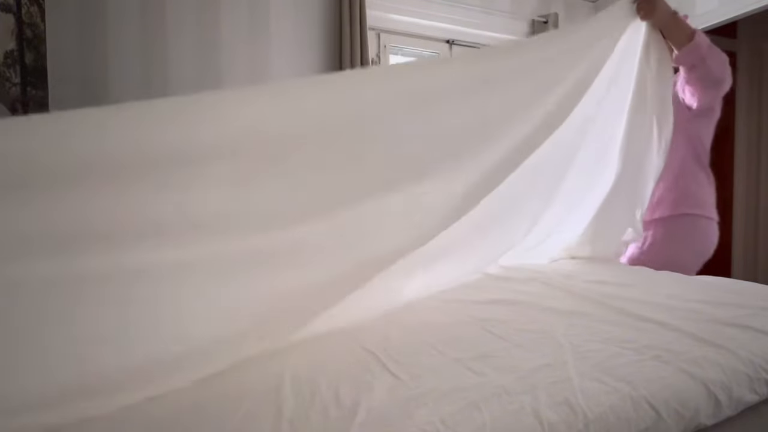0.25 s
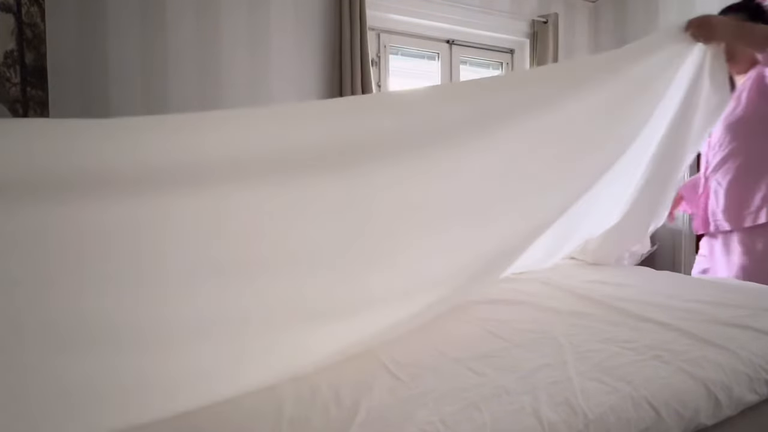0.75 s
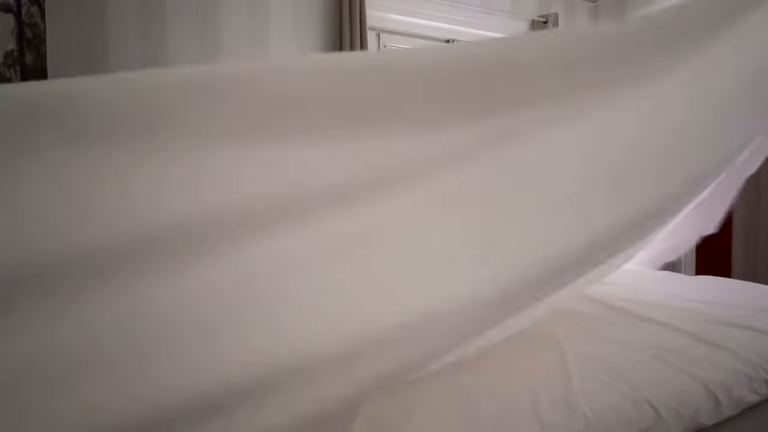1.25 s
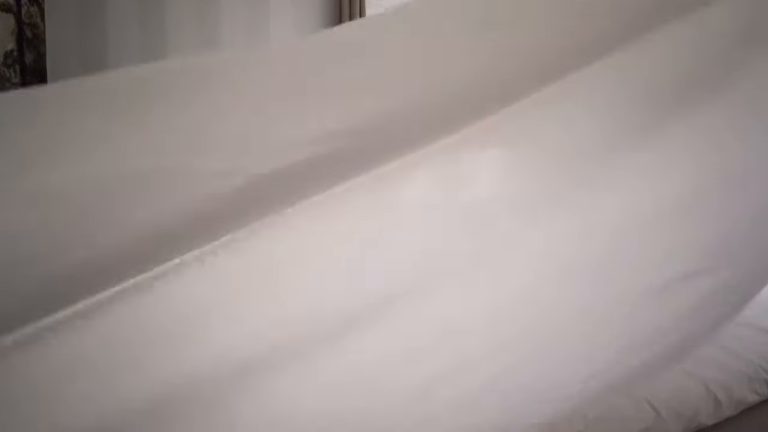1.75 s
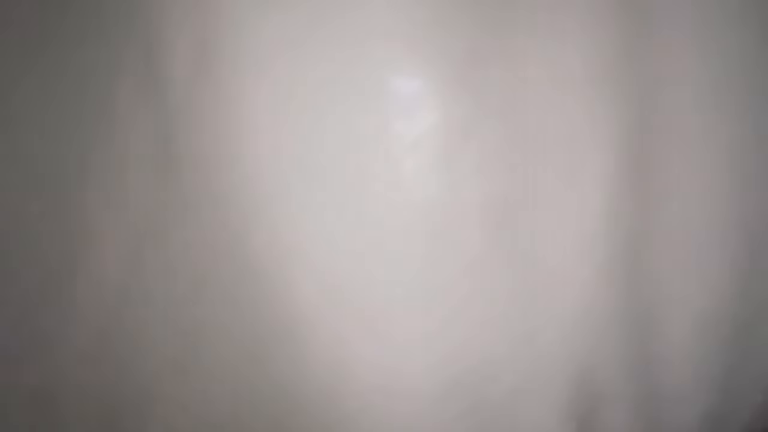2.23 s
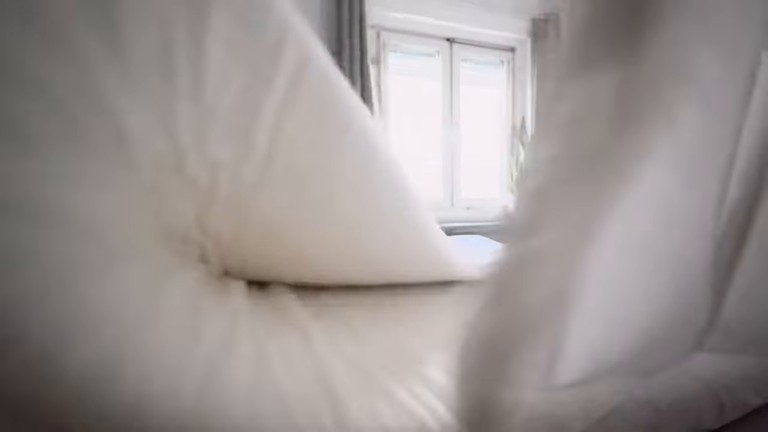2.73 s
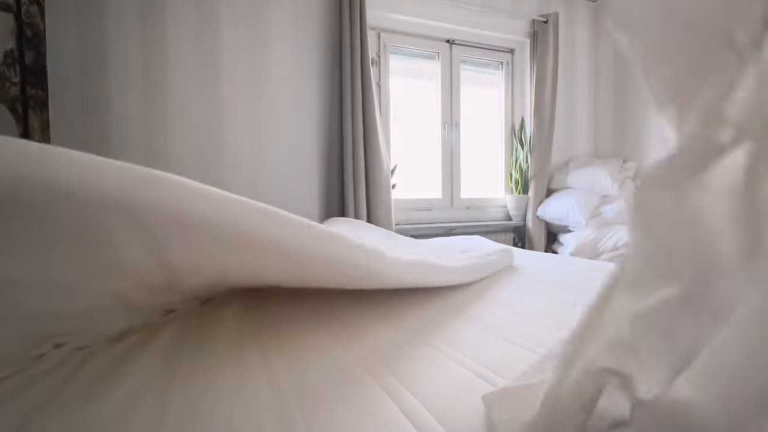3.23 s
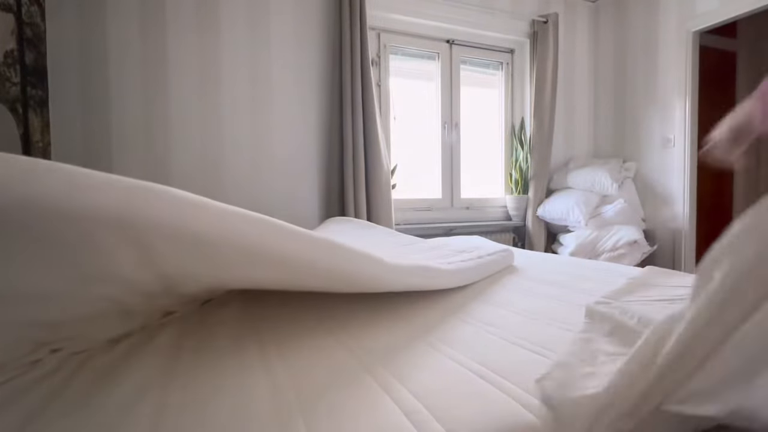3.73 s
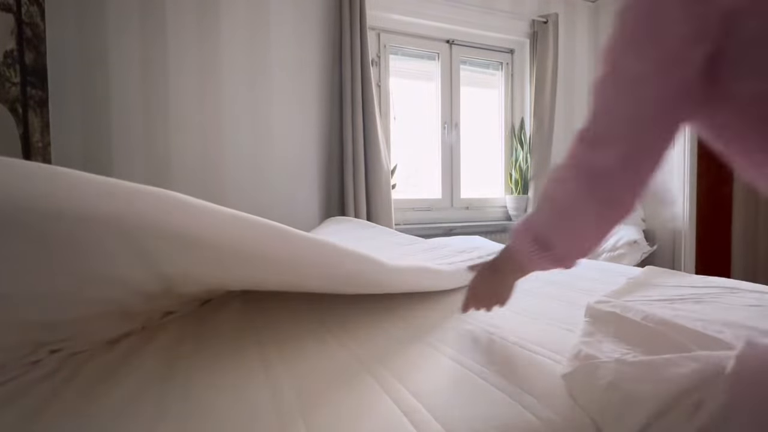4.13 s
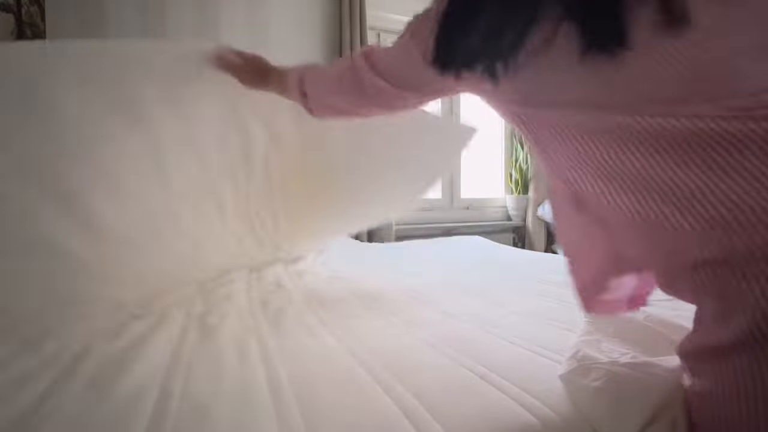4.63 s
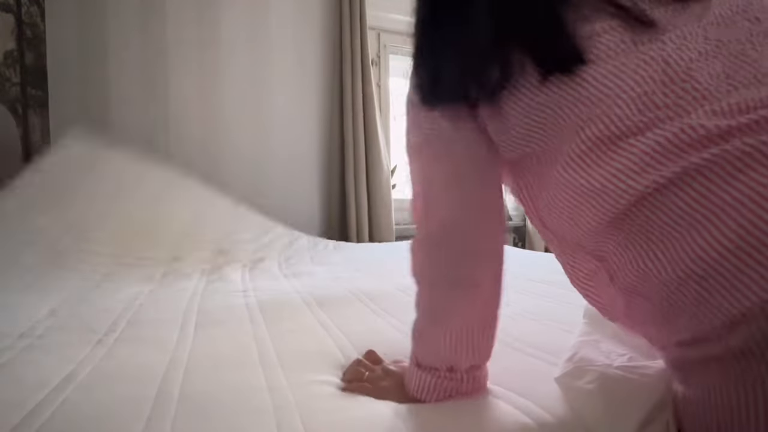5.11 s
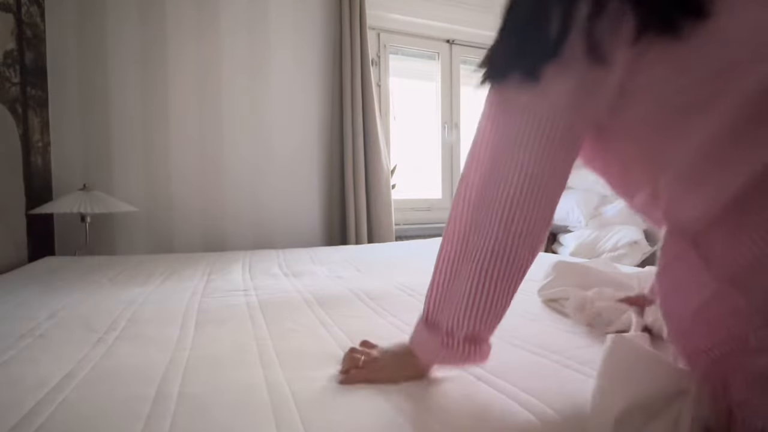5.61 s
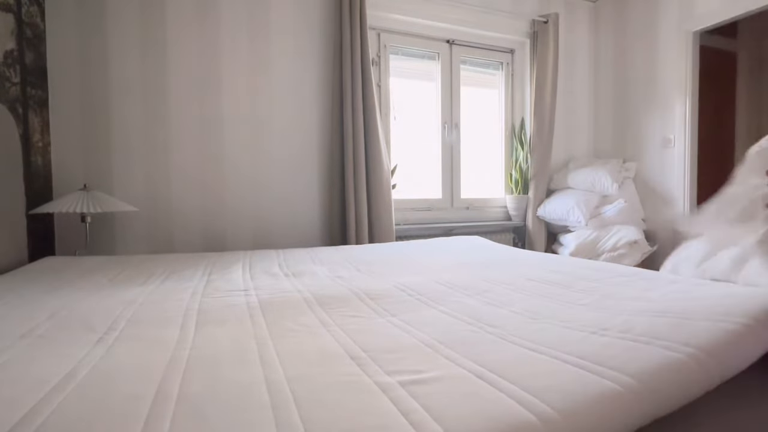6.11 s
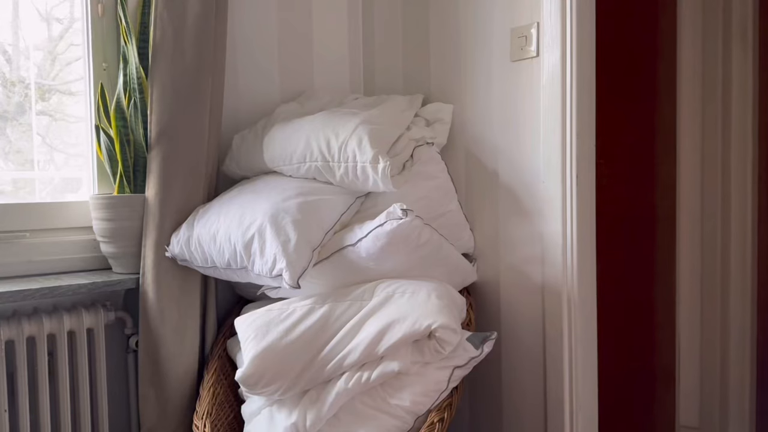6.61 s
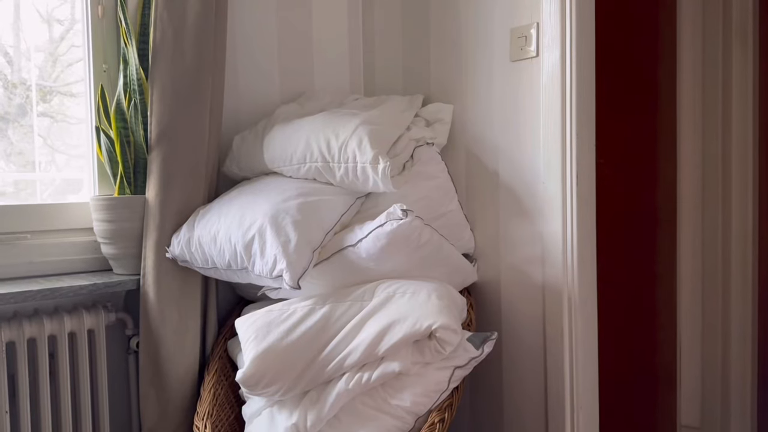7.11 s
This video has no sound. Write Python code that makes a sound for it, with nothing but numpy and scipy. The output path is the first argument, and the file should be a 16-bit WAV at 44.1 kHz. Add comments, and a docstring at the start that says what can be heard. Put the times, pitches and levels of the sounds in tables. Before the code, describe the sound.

Light cotton cloth whispers and crackles near two spaced microphones in a small, slightly live room. A quick swish leads to a sharp woody knock, then soft low flaps and a cluster of dry fabric snaps. Quieter rustling and footstep-like board knocks come next, then a thick topper lands with a big low thud. Brief hand scuffs continue until the sound stops suddenly, leaving faint room hush.

```python
"""Making a bed in a small bedroom

A cotton sheet and a thick topper are spread close to two spaced microphones. Cloth slides and crackles as
shaped noise; folds snap and scuff as brief noise bursts; floor boards knock under steps as struck resonances.
Heavy bedding thumps as low pushes of air and sets the room's bass modes ringing.
The sound cuts to the quiet room near the end, steady noise with one small click."""
import sys
import numpy as np
from scipy import signal
from scipy.fft import rfft, irfft, next_fast_len
from scipy.io import wavfile
from scipy.ndimage import uniform_filter1d, map_coordinates

SR = 44100
rng = np.random.default_rng(int(sys.argv[2]) if len(sys.argv) > 2 else 0)


def inscribe(sig):
    """Save sig as 16-bit PCM at rate SR to the path in sys.argv[1].

    A 1-D sig is mono; a 2-D sig holds one channel per row.
    Samples are clipped to [-1, 1] before scaling.
    """
    pcm = np.round(np.clip(np.atleast_2d(sig).T, -1, 1) * 32767)
    wavfile.write(sys.argv[1], SR, pcm.astype(np.int16))


N = 324311
LAG_S = 0.000341  # the left microphone stands farther from the bed
CUT_S = 6.612  # the sound cuts to the quiet room here

# Strokes of cloth over cloth: (time of greatest level [s], slide level [dB], nap level against slide [dB],
# time to rise 10 dB [s], time to fall 10 dB [s]); the signs of the last two are ignored
STROKES = [(0.49, -66.5, -37, -0.24, 0.65), (0.79, -72, -8.5, 0.1, 2), (1.11, -49, -15.5, 0.0841, 0.0745),
           (1.2, -71, -27, -0.09, -0.23), (1.33, -57.5, -17, 0, 0.1), (1.891, -57.5, -11, -0.04, 0.12),
           (2.02, -59.5, -6, 0.13, 0.48), (2.61, -53, -25, -0.1, -0.09), (2.689, -52.5, -7.5, 0.02, 0.18),
           (3.36, -69, -9, 0.1, -0.5), (3.47, -64.5, -13.5, -0.46, 0.7), (3.8, -59.5, -7, 0.1, 0.1),
           (4.36, -66, -8.5, 0.3, 0.2), (4.66, -60.5, -4.5, 0.11, 0.21), (5.027, -58, -9, 0.12, 0.1),
           (5.27, -63.5, -21, -0.23, 0.4), (5.55, -61.5, -22, -0.13, 0.03), (5.769, -55.5, -18, -0.04, 0.1),
           (5.84, -56.5, -12, 0.04, 0.06), (6.05, -66.5, -34, -1, 1), (6.26, -59.5, -10, 0.02, 0.23)]


def amp(db):
    """Level law: 20 dB is a factor of ten in amplitude."""
    return 10 ** (np.asarray(db) / 20)


def unit(x):
    """Normalisation by mean power: scaled to rms 1."""
    return x / np.sqrt(np.mean(x ** 2) + 1e-20)


def along(points, hz):
    """Logarithmic pitch scale: (Hz, value) points joined by straight lines over log frequency."""
    f, v = np.transpose(points)
    return np.interp(np.log(hz + 1), np.log(f + 1), v)


def filtered(x, response):
    """Linear filtering: the spectrum of x times a complex response of frequency."""
    n = x.shape[-1]
    padded = next_fast_len(n + 8192)  # keeps the filter's tail from wrapping round
    spectrum = rfft(x, padded) * response(np.fft.rfftfreq(padded, 1 / SR))
    return irfft(spectrum, padded)[..., :n]


def lag(hz, s=LAG_S):
    """Arrival-time difference as linear phase: left half late, right half early."""
    return np.exp(-1j * np.pi * hz * s * np.array([[1], [-1]]))


def resonances(modes, f):
    """Modal superposition: a causal sum of (Hz, width Hz, dB) band-pass peaks with alternating signs."""
    total = 0
    for k, (centre, width, db) in enumerate(modes):
        peak = 1j * f * width / (centre * centre - f * f + 1j * f * width)
        total = total + (-1) ** k * amp(db) * peak
    return total


def wobble(rate):
    """Slow random modulation: a smooth curve through rate random knots a second."""
    knots = rng.standard_normal(int(N * rate / SR) + 4)
    return map_coordinates(knots, [np.arange(N) * rate / SR])


def curves(rows):
    """Linear interpolation: one value per sample for each column after the time."""
    s, *columns = np.transpose(rows)
    return [np.interp(np.arange(N) / SR, s, c) for c in columns]


def cloth():
    """Friction noise at five scales: air pushed, big folds, sliding faces, thread on thread, brushed nap."""
    # Resting levels beneath the strokes, with a sudden change at 1.89 s:
    # (time [s], pushed air [dB], folds [dB], sliding faces [dB])
    resting_levels = [(0.0, -73.5, -68, -72), (0.29, -52, -70, -70), (0.53, -98, -79, -75.5),
                      (0.7, -70.5, -67.5, -65), (0.99, -66, -59.5, -71), (1.25, -54.5, -55, -59.5),
                      (1.58, -51.5, -54.5, -66.5), (1.72, -61, -64.5, -65), (1.882, -69.5, -69, -76),
                      (1.89, -64.5, -56, -60), (2.37, -56.5, -63, -62.5), (2.81, -56, -57, -62.5),
                      (3.12, -62.5, -61, -69.5), (3.3, -51.5, -59.5, -67), (3.6, -63.5, -59, -71),
                      (4.2, -62.5, -64.5, -68.5), (4.7, -61, -64, -70), (4.85, -54, -62.5, -71),
                      (5.11, -64, -59, -68), (5.35, -46.5, -54, -72), (5.68, -51, -59.5, -71.5),
                      (5.9, -58.5, -54.5, -72), (6.15, -53.5, -56.5, -66.5), (6.27, -54.5, -55, -63.5),
                      (6.61, -52.5, -52.5, -62.5)]
    # Spectra of the five scales, each: (frequency [Hz], relative power density [dB])
    air_spectrum = [(15, -37), (25, -10.5), (65, 7.5), (151, -14), (200, -15.5), (260, -38.5), (440, -120)]
    folds_spectrum = [(60, -44.5), (150, 0), (300, -4.5), (700, -5.5), (1200, -12), (2500, -24),
                      (6000, -90.5)]
    slide_spectrum = [(500, -27), (1200, -1), (2500, -6.5), (4000, -10), (5500, -11.5), (9000, -34),
                      (12000, -92.5)]
    weave_spectrum = [(2500, -31.5), (5000, -9.5), (7000, -11.5), (10000, -14.5), (12000, -49.5)]
    nap_spectrum = [(9000, -28), (12500, 7), (14000, -1.5), (16000, -17.5)]
    usual_slide_db, weave_db, weave_growth = -63, -68, 0.87  # weave at the usual slide; it swings less
    folds_in_stroke_db = -7.5  # folds dragged along, against the slide
    nap_rest_db, nap_steeper = -90.5, 1.2  # nap between strokes; it comes and goes faster than the slide
    crackle_db = -6  # against the slide

    air_db, folds_db, rest_db = curves(resting_levels)
    _, peak_db, nap_db = np.transpose(STROKES)[:3]
    stroke_power = strokes(peak_db)
    slide = np.sqrt(amp(rest_db) ** 2 + stroke_power)
    folds = np.sqrt(amp(folds_db) ** 2 + amp(folds_in_stroke_db) ** 2 * stroke_power)
    weave = amp(weave_db) * (slide / amp(usual_slide_db)) ** weave_growth
    nap = np.sqrt(amp(nap_rest_db) ** 2 + strokes(peak_db + nap_db, nap_steeper))
    flutter = amp(1.0 * wobble(25))  # the faces touch and part unevenly

    # The two-row gains tilt a layer slightly to one side, in dB
    layers = amp(air_db) * rustle(air_spectrum, patchy_db=1.5, grain_db=-2.5, grain_rate=9.8)
    layers += folds * rustle(folds_spectrum, patchy_db=-1.0, grain_db=2.5, grain_rate=14) * amp([[-.6], [.6]])
    faces = rustle(slide_spectrum, patchy_db=1.5, grain_db=0.5, grain_rate=240)
    layers += flutter * slide * faces * amp([[.8], [-.8]])
    layers += amp(crackle_db) * slide * crackle()
    threads = rustle(weave_spectrum, patchy_db=0.5, grain_db=-0.1, grain_rate=230)
    layers += flutter * weave * threads * amp([[.6], [-.6]])
    brushed = rustle(nap_spectrum, patchy_db=2.5, grain_db=1.5, grain_rate=140,
                     delay=np.ones_like, alike=[(14000, 0.83)])  # straight ahead
    layers += flutter * nap * brushed
    return layers * (np.arange(N) / SR < CUT_S)


def strokes(levels_db, steeper=1):
    """Incoherent addition: strokes rise and fall evenly in dB, and overlapping ones add in power."""
    s, _, _, rise, fall = np.transpose(STROKES)[:, :, None]
    t = np.arange(0, N, 64) / SR - s
    distance = np.where(t < 0, -t / np.abs(rise), t / np.abs(fall))
    db = levels_db[:, None] - 10 * steeper * distance
    return np.repeat(np.sum(amp(db) ** 2, axis=0), 64)[:N]


def rustle(spectrum, patchy_db, grain_db, grain_rate, delay=lag, alike=None):
    """Shaped, partly coherent stereo noise of rms 1: patchy in time and pitch, and lumpy in level."""
    # Usual coherence of the spaced microphones: (frequency [Hz], left-right likeness [0 to 1])
    usual_likeness = [(40, 1), (150, 0.75), (400, 0.34), (1000, 0.18), (4000, 0.12), (9000, 0.1),
                      (14000, 0.26)]
    likeness = usual_likeness if alike is None else alike

    z = signal.stft(rng.standard_normal((2, N)), nperseg=512)[2]
    patches = uniform_filter1d(rng.standard_normal(z.shape[1:]), size=6, axis=0)
    patches = uniform_filter1d(patches, size=8, axis=1)
    pair = signal.istft(z * amp(patchy_db * unit(patches)), nperseg=512)[1][:, :N]
    pair = pair * amp(grain_db * wobble(grain_rate))  # in cloth, fibres catch and slip

    def mid_side(hz):
        turn = np.arccos(np.clip(along(likeness, hz), -1, 1)) / 2  # the mid-side mix sets the likeness
        return amp(along(spectrum, hz)) * [np.cos(turn), np.sin(turn)]

    mid, side = filtered(pair, mid_side)
    return unit(filtered(np.array([mid + side, mid - side]), delay))


def crackle():
    """Random impulse train: small ticks of the starched cloth, scattered in time, pitch, size and direction."""
    per_s, spread_db, middle_hz = 500, 2, 3000
    count = int(per_s * N / SR)
    when, size, pan, *pitch = rng.random((5, count))
    hz = middle_hz * 2 ** (2.4 * (sum(pitch) - 1))[:, None]
    cycles = hz * np.arange(128) / SR
    size_gain = amp(-spread_db * np.log(1 - size))[:, None]
    tick = size_gain * np.exp(-cycles / 1.1) * np.sin(2 * np.pi * cycles)  # dies in one or two cycles
    at = ((when * N).astype(int)[:, None] + np.arange(128)).ravel()
    sides = [np.bincount(at, (tick * gain[:, None]).ravel(), N)[:N]
             for gain in (np.sqrt(pan), np.sqrt(1 - pan))]
    return unit(filtered(np.array(sides), lag))


def snaps():
    """Sudden release of tension: each crease snaps straight in a brief, band-limited burst of noise."""
    # Creases: (time [s], peak level before the room [dB], pitch [Hz], decay by 60 dB [s])
    creases = [(1.977, -43.5, 3500, .035), (2.168, -46, 3000, 0.028), (2.52, -44, 2800, .009),
               (2.576, -46, 1600, .02), (2.66, -45, 5040, .025), (2.683, -41.5, 1590, 0.024),
               (2.719, -40, 900, .02), (2.754, -39.5, 1700, 0.0087), (3.781, -55, 2800, .015),
               (3.836, -50, 2770, .02)]
    out, t = np.zeros((2, N)), np.arange(SR // 2) / SR
    for s, db, hz, t60 in creases:
        burst = rng.standard_normal(len(t)) * t * amp(-60 * t / t60)
        tick = filtered(burst, lambda f: resonances([(hz, 1.5 * hz, 0)], f) ** 2)
        add(out, s, amp(db) * in_room(tick / np.abs(tick).max(), wet_db=-3))
    return out


def scuffs():
    """Friction over a periodic texture: a swell of noise around a pitch set by the stroke's speed over threads."""
    # Hand or fold over cloth: (time [s], level before the room [dB], pitch [Hz], length [s], width over pitch [1])
    short_strokes = [(0.439, -59, 705, 0.09, 1.4), (0.508, -57, 1480, 0.065, 0.91),
                     (1.061, -49, 2640, 0.09, 0.56), (2.353, -52.5, 1100, 0.053, 0.33),
                     (2.672, -44.5, 750, 0.065, 1.24), (4.636, -46.5, 1480, 0.021, 0.17),
                     (5.441, -56, 450, 0.059, 1.1), (5.508, -49.5, 516, 0.11, 1.4),
                     (6.188, -53.5, 350, 0.086, 1.2), (6.541, -55.5, 449, 0.048, 0.61)]
    out, t = np.zeros((2, N)), np.arange(SR // 2) / SR
    for s, db, hz, length, width in short_strokes:
        hiss = filtered(rng.standard_normal(len(t)), lambda f: resonances([(hz, width * hz, 0)], f) ** 2)
        swell = np.sin(np.pi * np.clip(t / length, 0, 1)) ** 2
        scuff = hiss * swell
        scuff = scuff * np.linalg.norm(swell) / np.linalg.norm(scuff)  # the energy of the bare swell
        add(out, s, amp(db) * in_room(scuff, wet_db=-6))
    return out


def knocks():
    """Impact excitation: a blow thuds at the struck spot's pitch and rings the boards; hard contact cracks bright."""
    # Blows: (time [s], level, 3 dB above the direct thud's peak [dB], thud centre [Hz], ring [dB], crack [dB],
    # crack upper corner [Hz], boom [dB], left-right tilt [dB], room against direct [dB], left lag [ms])
    blows = [(0.611, -42.5, 463, 5, -5, 3000, -7.5, 0, 0, 0.42),
             (1.185, -30, 790, -25, -12, 2000, -13.5, 0.5, 4, 0.32),
             (1.388, -11.5, 396, 6.5, 1.5, 5200, -21.5, 0, -4.5, 0.32),
             (1.888, -36, 298, -21, -9, 6000, -9.5, 1, 1, 0.27),
             (2.607, -35, 163, -7, 0, 5040, -11, 2, 2, 0.5),
             (2.993, -43, 503, -7, -14, 2000, -17, -1, 2, 0.28),
             (3.254, -20.5, 420, -14.5, -6, 3920, -19, 1, 3.5, 0.44),
             (3.466, -40, 470, -15, -7.5, 1500, -6, -1.5, 3.5, 0.48),
             (3.989, -26.5, 293, -5.5, -5.5, 990, -25.5, 0, -1, 0.26),
             (5.24, -28, 218, -15, -7.5, 3480, -39, 1.5, 0.5, 0.66),
             (5.941, -38, 477, -13, -29.5, 3030, -35, -2, 2, 0.42),
             (6.04, -29.5, 392, -1, -17, 3500, -15.5, 0, -2.5, 0.37),
             (6.088, -39.5, 296, -7, -30, 1500, -33, -1, -1, 0.4),
             (7.081, -60, 300, -1, 17, 7030, -3, -2, 4.5, 0.089)]
    # Board modes: (frequency [Hz], width [Hz], relative level [dB], left-right difference [dB])
    board_modes = [(222.2, 16, -6, 6), (250, 15, -3.5, -4), (284.4, 20, 4, 6), (399, 15, 10.5, -6),
                   (443.5, 23, 5, 0), (468, 23, -8, 0), (488, 28, 4, 1.5), (566, 22, -3, -8.5),
                   (628, 11, -6.5, -3), (770, 12, -14, -0.3)]
    # Resonances of the crack: (frequency [Hz], width [Hz], relative level [dB])
    crack_modes = [(825, 400, 9.5), (2400, 1400, 7), (4330, 570, 8), (8300, 8400, 0)]

    def peak(x):
        return x / np.abs(x).max()

    out, t = np.zeros((2, N)), np.arange(SR) / SR
    sides = [[(hz, width, db + side * tilt_db / 2) for hz, width, db, tilt_db in board_modes]
             for side in (1, -1)]  # each mode favours one side
    late = 1. * (np.arange(SR) == round(.0015 * SR))  # the boards give way just after the crack
    for s, db, hz, ring_db, crack_db, top_hz, boom_db, pan_db, room_db, lag_ms in blows:
        def soft_contact(f):
            return 1 / (1 - (f / top_hz) ** 2 + 1.2j * f / top_hz) ** 2

        thud = peak(filtered(late, lambda f: resonances([(hz, 0.95 * hz, 0)], f) ** 2))
        ring = peak(filtered(thud, lambda f: [resonances(modes, f) for modes in sides]))
        crack = peak(filtered(1. * (t == 0), lambda f: resonances(crack_modes, f) * soft_contact(f)))
        heard = in_room(thud + amp(ring_db) * ring, room_db, lag_ms / 1000)
        heard += amp(crack_db) * in_room(crack, wet_db=5.5, lag_s=lag_ms / 1000)
        tilt = amp([[pan_db / 2], [-pan_db / 2]])
        add(out, s, amp(db - 3.0) * heard * tilt + amp(db + boom_db) * boom(t))
    return out


def thumps():
    """Volume displacement: one low push of air, a puff from the cloth, then the room's boom."""
    # Bedding and weight landing: (time [s], level of the whole [dB], pitch [Hz], boom against push [dB],
    # puff against an rms of one twelfth [dB])
    landings = [(0.09, -56, 88, 6.5, -11), (1.195, -45.5, 102.9, -2.5, 3), (1.502, -35.5, 135.4, -1, -15),
                (1.585, -44.5, 210, -3, -17), (1.893, -35.5, 106.5, -7, -10), (1.903, -34.5, 64, -13, -20),
                (2.387, -42, 108, -10, -13), (2.446, -45, 115, -5.5, -14.5), (2.704, -40.5, 190, -22, -6),
                (2.716, -39, 115, -20, -8.5), (3.15, -47.5, 89.5, 8, -2), (3.88, -51, 199, -13, -9),
                (4.012, -43.5, 62, 10, -34), (4.64, -51.5, 97, 8.5, 0.5), (4.699, -35, 105, -11.5, -20.5),
                (4.717, -40.5, 100, -7, -30), (4.744, -32, 68, -1, -46), (4.847, -39, 110, -13, -21),
                (5.025, -39.5, 103.3, -8, -18), (5.048, -44.5, 120.4, -4.5, -9.5),
                (5.244, -16, 97.1, 2.5, -22), (6.199, -45.5, 145, -13, -20), (6.27, -46.5, 79.4, -24, -14),
                (6.551, -43.5, 129.7, -14, -6), (6.588, -45.5, 86, -11, -25)]
    # Spectrum of the puff: (frequency [Hz], relative power density [dB])
    puff_spectrum = [(100, -16.5), (300, 3), (800, 1), (2000, -18), (5000, -38), (10000, -63)]
    out, t = np.zeros((2, N)), np.arange(SR) / SR
    for s, db, hz, boom_db, puff_db in landings:
        cycles = hz * t
        push = 1.87 * cycles ** 0.9 * np.exp(-(cycles / 1.23) ** 2) * np.sin(2 * np.pi * cycles)
        breath = rng.standard_normal(SR) * (1 - np.exp(-t / 0.039)) * amp(-60 * t / 0.12)
        puff = filtered(breath, lambda f: amp(along(puff_spectrum, f)))
        puff = amp(puff_db) * unit(puff) / 12
        add(out, s, amp(db) * (in_room(push + puff, wet_db=-4.5) + amp(boom_db) * boom(t)))
    return out


def boom(t):
    """Room modes: they start once the push has crossed the room, build up and ring on."""
    # Standing waves: (frequency [Hz], mean level [dB], decay by 60 dB [s])
    room_modes = [(54.46, -3.5, 0.81), (73.1, -10, 0.48), (125, -17, 0.44), (210, -15, 0.24),
                  (287, -26.5, 0.36)]
    t = np.maximum(t - .008, 0)
    swell = 1 - np.exp(-t / 0.0061)
    ringing = 0
    for hz, db, t60 in room_modes:
        level_db = db + rng.normal()  # each blow excites the modes a little differently
        ringing = ringing + amp(level_db - 60 * t / t60) * np.sin(2 * np.pi * hz * t)
    return swell * ringing


def in_room(x, wet_db, lag_s=LAG_S):
    """Direct and diffuse field: lagged direct sound and a fresh decaying tail, alike on both sides in the bass."""
    # Reverberation: (frequency [Hz], decay by 60 dB [s])
    decay = [(100, 0.47), (400, 0.12), (1000, 0.24), (3000, 0.24), (8000, 0.24), (16000, 0.053)]
    hz, t, (a, b) = signal.stft(rng.standard_normal((2, SR // 2)), SR, nperseg=256)
    alike = 1 / (1 + (hz[:, None] / 150) ** 2)
    z = np.array([a, alike * a + np.sqrt(1 - alike ** 2) * b])
    tail = signal.istft(z * amp(-60 * t / along(decay, hz)[:, None]), SR, nperseg=256)[1]
    mono = np.atleast_2d(x).mean(axis=0)
    wet = signal.fftconvolve(mono[None], tail, axes=1)[:, :len(mono)]
    wet *= np.linalg.norm(mono) / np.linalg.norm(wet, axis=1, keepdims=True)
    delayed = np.roll(x, 16, axis=-1)  # leaves space for the early side
    return filtered(delayed, lambda hz: lag(hz, lag_s)) + amp(wet_db) * wet


def add(out, s, x):
    """Superposition: adds a sound at s; sounds begun before the cut to the quiet room end there."""
    i = round(s * SR)
    end = round(CUT_S * SR) if s < CUT_S else N
    out[:, i:end][:, :x.shape[-1]] += x[:, :end - i]


def still_room():
    """Stationary background noise: the quiet room at a low, gently wavering level."""
    # Spectrum of the still room: (frequency [Hz], relative power density [dB])
    quiet_spectrum = [(18, -37), (30, -2.5), (55, -4.5), (332, -19.5), (399, -22), (443, -21.5),
                      (1290, -32), (2620, -34), (4780, -37), (6890, -29.5), (7860, -41), (15500, -36)]
    return amp(-77) * rustle(quiet_spectrum, patchy_db=1, grain_db=.5, grain_rate=9)


def scene():
    """Linear superposition of all sources at the microphones."""
    return cloth() + snaps() + scuffs() + knocks() + thumps() + still_room()


def record(dry):
    """Linear tone shaping: low bass rolled off, a dip around 11 to 12 kHz, silence above the band limit."""
    # Overall tone: (frequency [Hz], gain [dB])
    tone = [(20, -24), (38, -6), (48, 0), (10000, 0), (10500, -6), (11000, -26), (12000, -26), (13000, -4),
            (14000, 0)]
    top_hz = 15750
    return filtered(dry, lambda hz: amp(along(tone, hz)) * (hz < top_hz))


dry = scene()
out = record(dry)
inscribe(out)
```